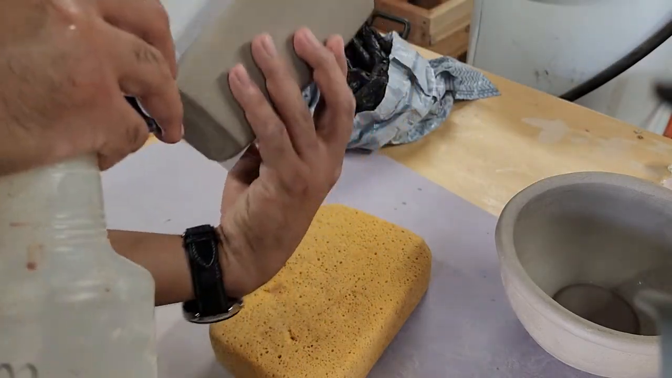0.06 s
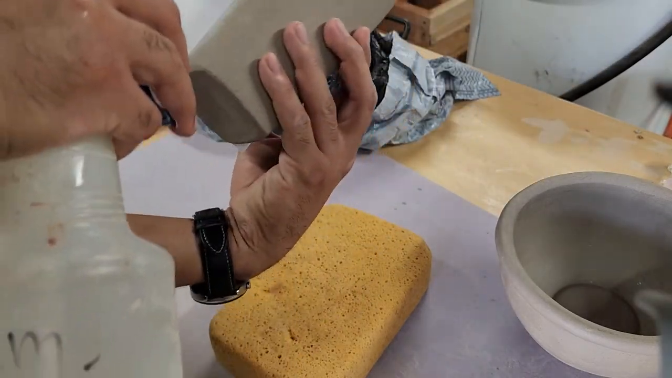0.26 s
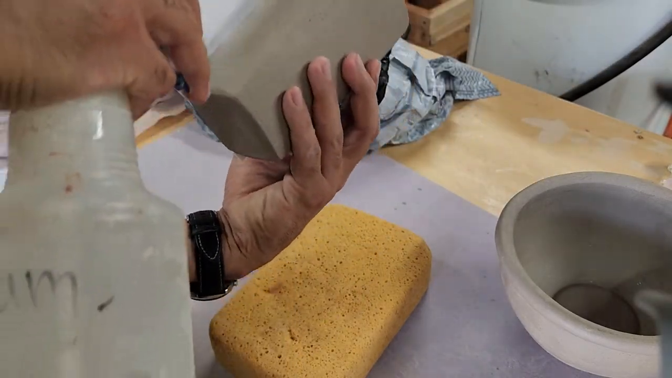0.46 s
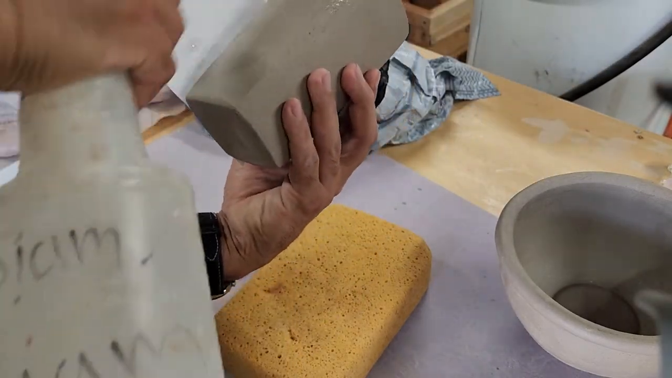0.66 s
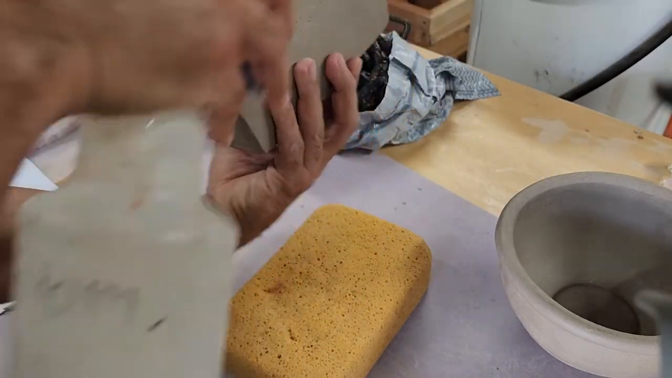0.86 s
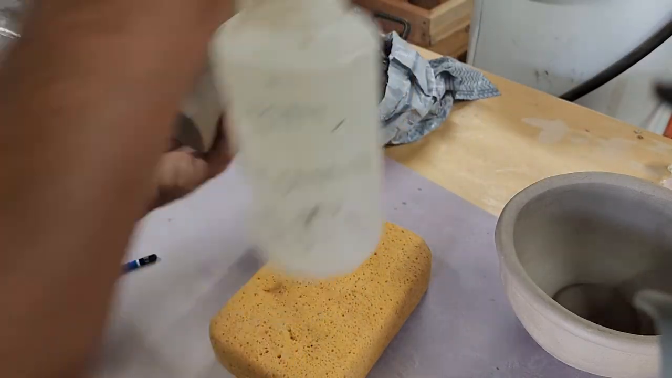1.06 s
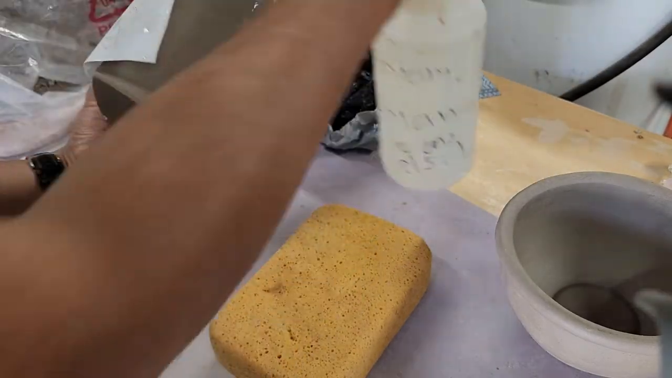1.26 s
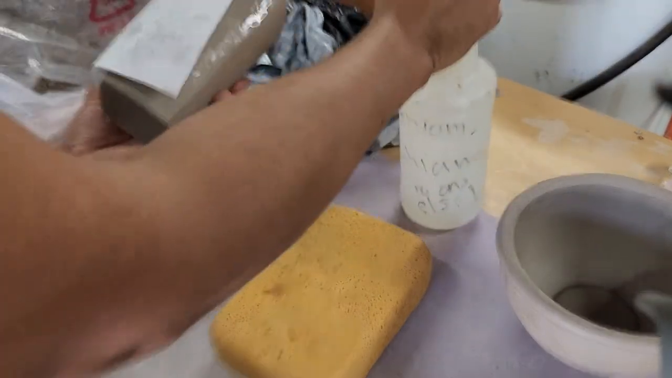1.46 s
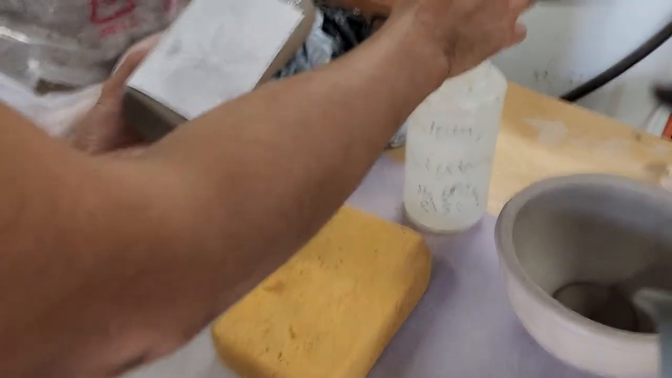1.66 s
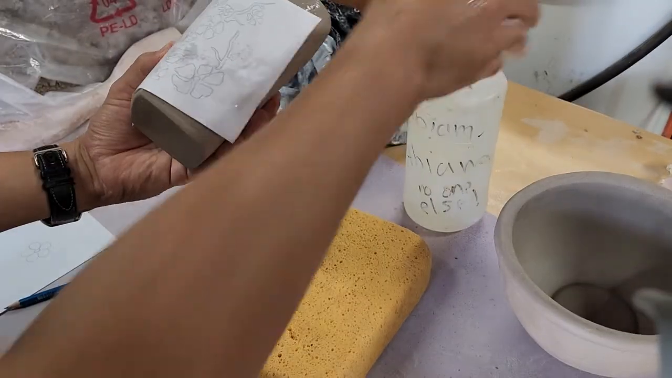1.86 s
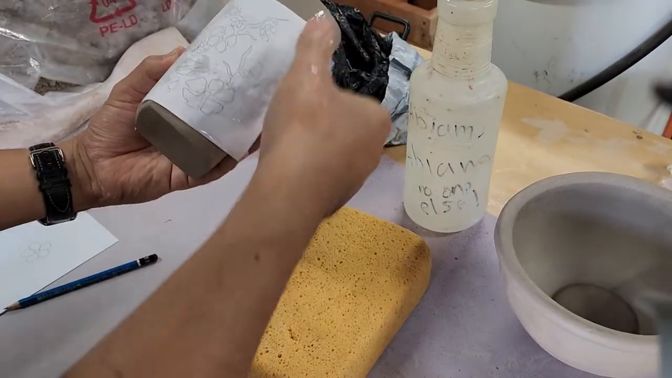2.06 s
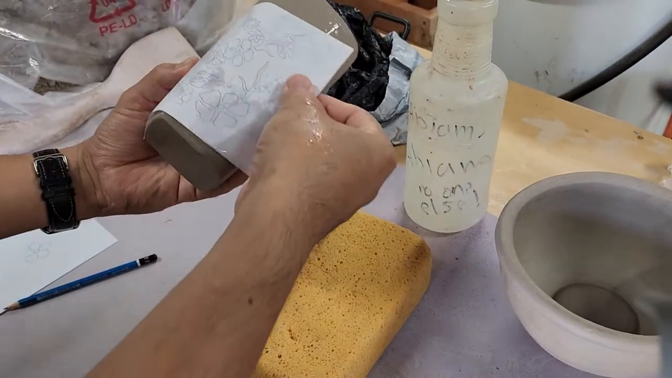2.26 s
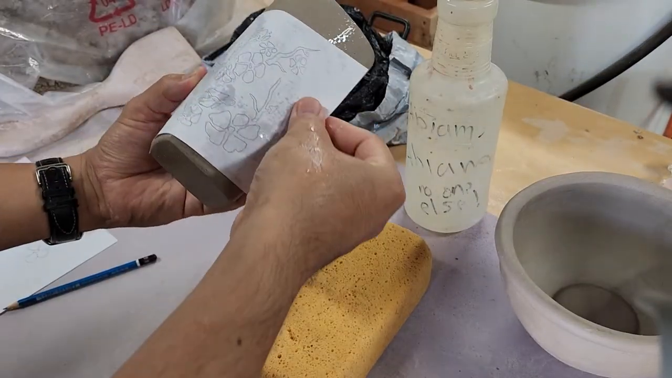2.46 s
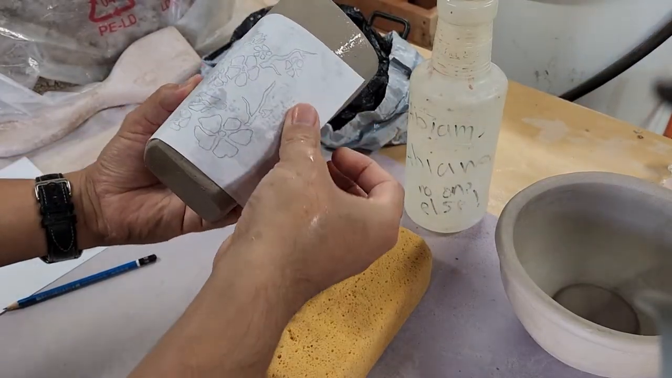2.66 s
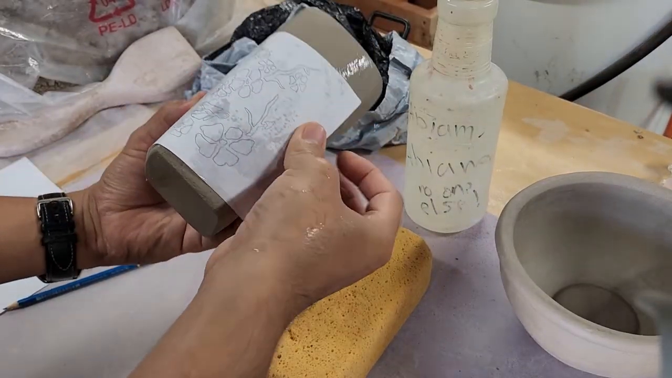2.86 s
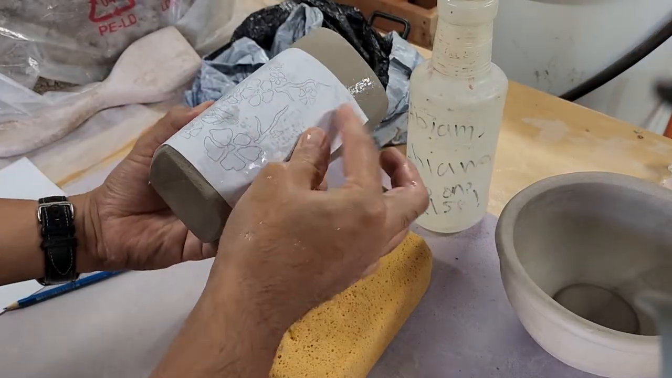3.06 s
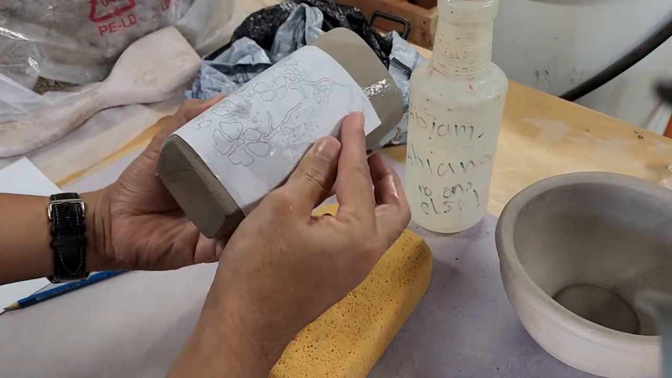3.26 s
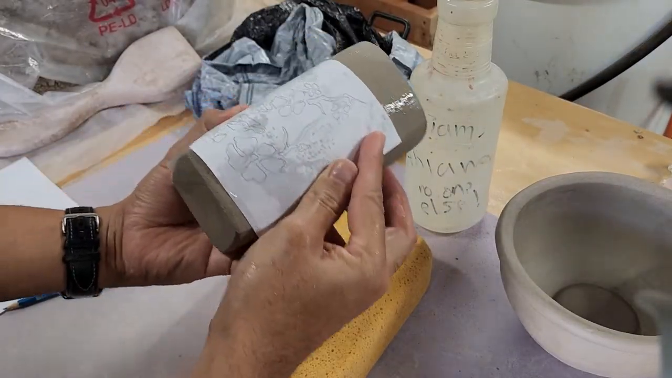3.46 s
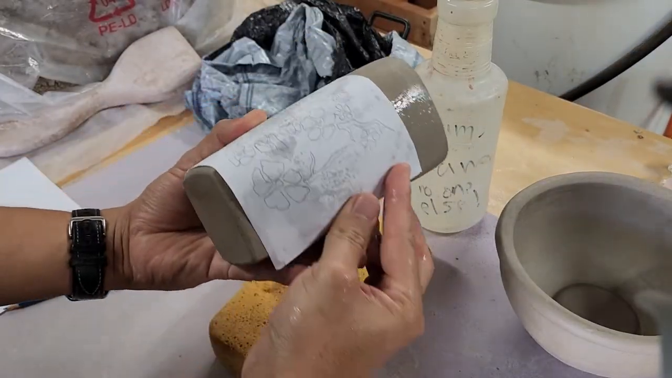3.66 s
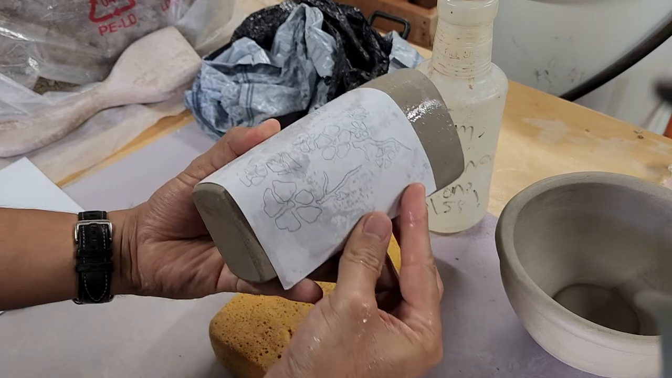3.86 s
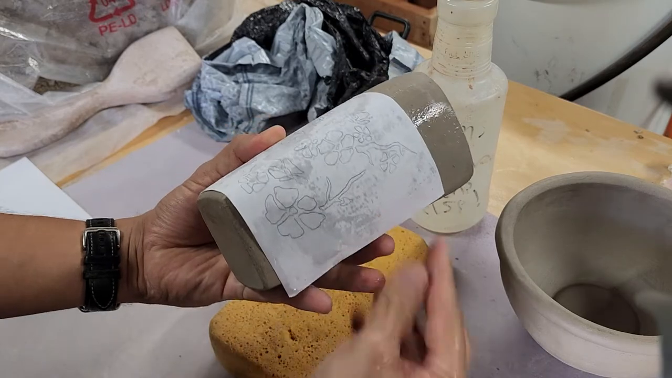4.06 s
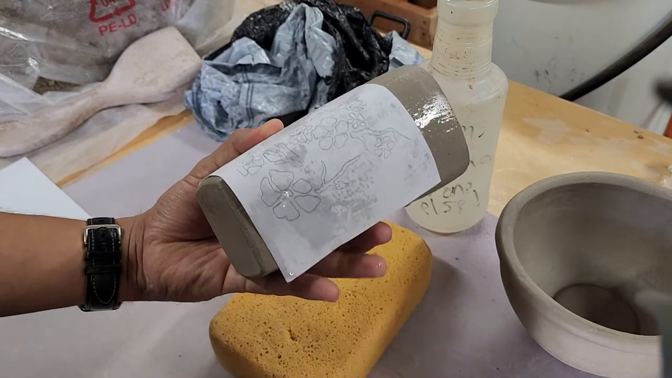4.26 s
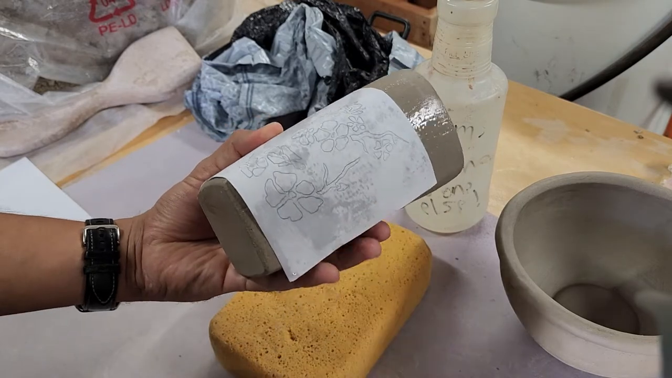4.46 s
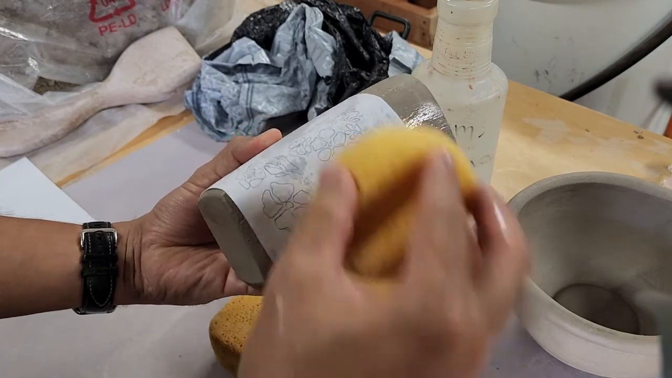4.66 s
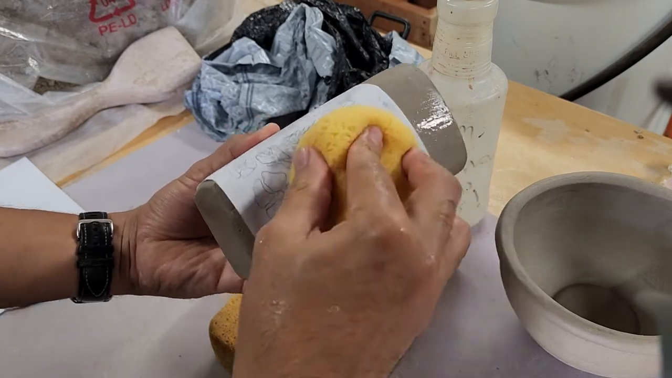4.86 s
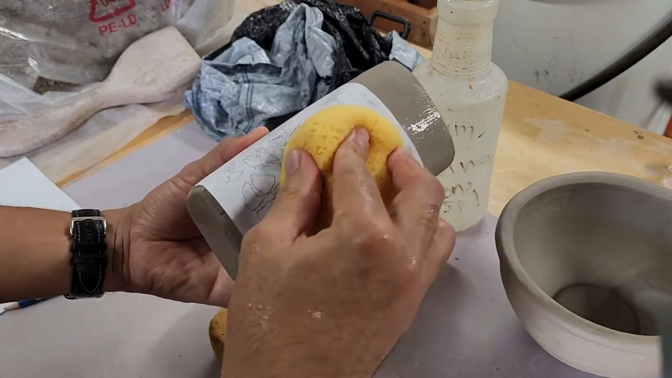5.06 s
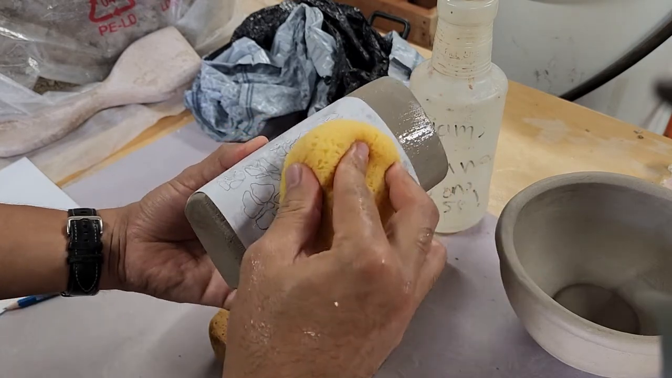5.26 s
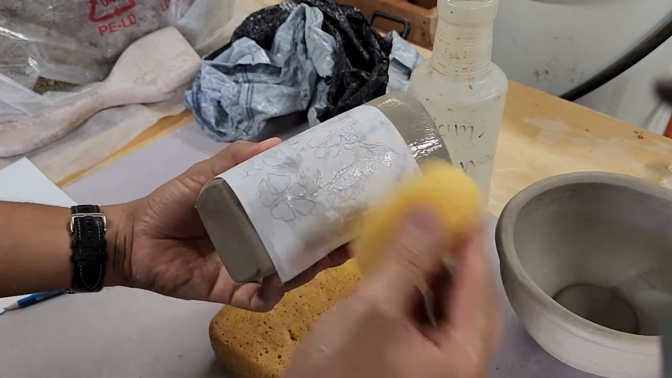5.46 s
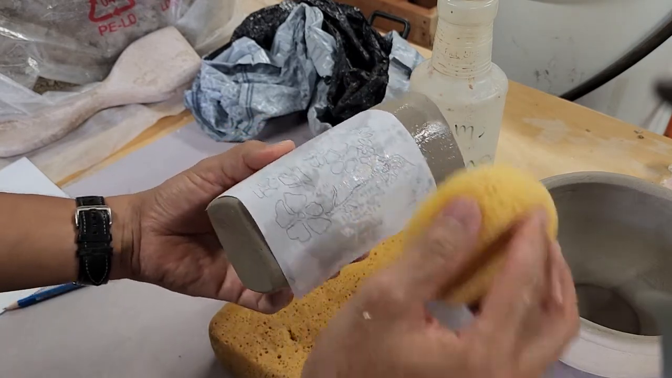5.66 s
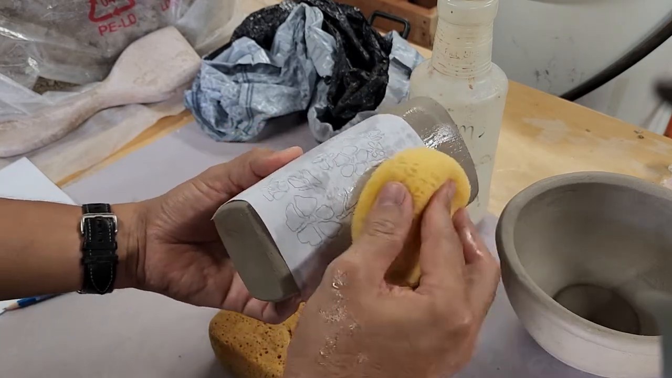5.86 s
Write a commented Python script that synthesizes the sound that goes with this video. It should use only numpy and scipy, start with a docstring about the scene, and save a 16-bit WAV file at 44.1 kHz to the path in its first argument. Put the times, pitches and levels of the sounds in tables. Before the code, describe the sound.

A trigger spray bottle gives one short wet hiss and snaps back, then thumps onto a wooden table before soft sponge dabs on clay.

```python
"""A trigger spray bottle mists a clay cup: coloured noise hisses and patters, and the lever snaps back.
The bottle is set down hard on a wooden table, made of decaying sines and short bursts of noise.
Fingers smooth wet paper onto the cup and a damp sponge dabs it, with small smacks and grainy brushing.
The small studio murmurs with ventilation, a fan hisses on the left, and a far motor hum swells and fades."""
import sys
import numpy as np
from scipy import signal
from scipy.fft import rfft, irfft, next_fast_len
from scipy.io import wavfile

SR = 44100
rng = np.random.default_rng(int(sys.argv[2]) if len(sys.argv) > 2 else 0)


def generate_wav(sig):
    """Save sig (samples, or channels by samples) to the path in sys.argv[1] as 16-bit PCM at SR."""
    pcm = np.round(np.clip(np.atleast_2d(sig).T, -1, 1) * 32767).astype(np.int16)
    wavfile.write(sys.argv[1], SR, pcm)


N = 260631
TIME = np.arange(N) / SR


def from_db(db):
    """Turn decibels into a plain multiplier."""
    return 10 ** (np.asarray(db) / 20)


def rms_one(x):
    """Scale a signal to an average power of 1."""
    return x / np.sqrt(np.mean(x ** 2) + 1e-20)


def at_hz(points, hz):
    """Read a table between its points, with frequency on a log scale as in hearing."""
    table_hz, value = np.transpose(points)
    return np.interp(np.log(np.maximum(hz, 1)), np.log(table_hz), value)


def pan(left_db):
    """Gains of the two channels, with the left louder than the right by left_db."""
    return from_db(np.array([[left_db], [-left_db]]) / 2)


def add(out, start_s, sound):
    """Mix a sound in at a given time, cutting what runs past the end."""
    i = int(round(start_s * SR))
    out[..., i:i + sound.shape[-1]] += sound[..., :N - i]


def low_pass(x, hz, order=2):
    """Soften everything above a frequency."""
    return signal.sosfilt(signal.butter(order, min(hz, SR / 2 - 1), fs=SR, output="sos"), x)


def band_pass(x, edges_hz, order=2):
    """Keep mainly what lies between two frequencies."""
    return signal.sosfilt(signal.butter(order, edges_hz, "band", fs=SR, output="sos"), x)


def noise(spectrum, size=N):
    """Coloured stereo noise of rms 1; the two channels are most alike in the bass."""
    # how alike left and right are: (frequency [Hz], likeness [0 to 1])
    likeness = [(60, 0.97), (130, 0.93), (290, 0.75), (640, 0.18), (1800, 0.31), (7000, 0.025)]
    padded = next_fast_len(size, True)
    hz = np.fft.rfftfreq(padded, 1 / SR)
    mid, side = rfft(rng.standard_normal((2, padded)))
    alike = np.clip(at_hz(likeness, hz), -1, 1)
    both = np.sqrt(1 + alike) * mid + np.sqrt(1 - alike) * side * [[1], [-1]]
    # keep up to an octave beyond each end of the table
    inside = (hz > spectrum[0][0] / 2) & (hz < spectrum[-1][0] * 2)
    coloured = both * inside * from_db(at_hz(spectrum, hz))
    return rms_one(irfft(coloured, padded)[:, :size])


def fade(t, t60):
    """Die away smoothly, by 60 dB in t60 seconds."""
    return np.exp(-np.log(1000) * t / t60)


def flutter(hz):
    """Random wobble, mostly slower than hz, with an rms of 1."""
    return rms_one(low_pass(rng.standard_normal(N), hz))


def envelope(start_s, stop_s, attack_s, t60):
    """Rise towards 1 from the start, hold, and die away after the stop."""
    rise = 1 - np.exp(-np.maximum(TIME - start_s, 0) / attack_s)
    return rise * fade(np.maximum(TIME - stop_s, 0), t60)


def swell(peak_s, width_s):
    """A bell-shaped rise and fall of height 1."""
    return np.exp(-.5 * ((TIME - peak_s) / width_s) ** 2)


def ring(modes):
    """A body's answer to one click: its modes are dying sines, every other one upside down."""
    t, out = TIME[:2 * SR], 0
    for k, (hz, db, t60) in enumerate(modes):
        out = out + (-1) ** k * from_db(db) * np.sin(2 * np.pi * hz * t) * fade(t, t60)
    return out


def ticks(rows):
    """Each tick is a quickly dying flurry of tiny contacts heard through one resonance."""
    out, t = np.zeros((2, N)), TIME[:SR // 4]
    for start_s, db, hz, octaves, t60 in rows:
        edges = hz * 2 ** (np.array([-.5, .5]) * octaves)
        # a filter edge must stay below half the sample rate
        edges = np.minimum(edges, [SR / 2 - 2, SR / 2 - 1])
        fading = fade(t, t60)
        flurry = noise([(100, 0), (16000, 0)], size=len(t)) * fading
        tick = band_pass(flurry, edges)
        # give each channel the energy of the fade alone, whatever the filter took away
        tick = tick * np.linalg.norm(fading) / np.linalg.norm(tick, axis=1, keepdims=True)
        add(out, start_s, from_db(db) * tick)
    return out


def motor():
    """A far motor is a single sine that swells in mid-run while its pitch slowly sags."""
    on_s, peak_s, off_s = 2.52, 3.42, 4.07
    base_db, swell_db, swell_s, waver_db = -65.5, 8.5, 0.29, 1.3
    peak_hz, sag_hz_per_s = 179.3, 5.2
    hz = peak_hz - sag_hz_per_s * (TIME - peak_s)
    db = base_db + swell_db * swell(peak_s, swell_s) + waver_db * flutter(6.9)
    running = envelope(on_s, off_s, attack_s=0.076, t60=3.4)
    tone = np.sqrt(2) * np.sin(2 * np.pi * np.cumsum(hz) / SR)
    return running * from_db(db) * tone


def background(rumble_db=-60.5, air_db=-76, fan_db=-77, fan_left_db=12, swell_s=0.042):
    """Steady noises of ventilation, room air and a fan on the left, with the far motor."""
    # colours of the three noises: (frequency [Hz], level per Hz [dB])
    rumble_colour = [(20, -31), (40, -6), (58, -14), (70, 4), (85, -6), (120, -11), (175, -13.5),
                     (250, -15), (340, -32)]
    air_colour = [(300, 1.5), (620, -7), (1000, 0), (3300, -11.5), (7000, -19), (9000, -32.5),
                  (16000, -23.5)]
    fan_colour = [(750, -14), (1050, -10), (1450, -1), (1750, -4), (2000, -15), (5700, -27.5), (6400, -19),
                  (9500, -33.5), (16000, -42.5)]
    # the rumble swells briefly: (time [s], rise [dB])
    rumble_swells = [(0.02, 4.1), (0.55, 4.1), (3.88, 3.7)]
    swells_db = sum(rise_db * swell(peak_s, swell_s) for peak_s, rise_db in rumble_swells)
    rumble = from_db(rumble_db + swells_db) * noise(rumble_colour)
    air = from_db(air_db) * noise(air_colour)
    fan = from_db(fan_db) * noise(fan_colour) * pan(fan_left_db)
    return motor() + fan + rumble + air


def pump():
    """Valves tick and spit through the stroke; spring, lever and piston fly back at its end."""
    # valve ticks: (time [s], level [dB], frequency [Hz], decay t60 [s])
    valves = [(0.5435, -55, 4300, 0.03), (0.574, -36, 14000, .03), (0.7959, -46.5, 5300, 0.017),
              (0.863, -44.5, 8000, 0.036), (0.928, -54, 4470, 0.062)]
    # spring squeak, lever crack, piston knock:
    # (time [s], level [dB], frequency [Hz], width [octaves], decay t60 [s])
    trigger_return = [(0.878, -52.5, 2900, .25, 0.17), (0.892, -28, 4820, 0.92, 0.017),
                      (0.895, -39.5, 1750, 1.8, 0.02)]
    valve_octaves = 2
    valve_rows = [(start_s, db, hz, valve_octaves, t60) for start_s, db, hz, t60 in valves]
    return ticks(valve_rows + trigger_return) * pan(3.7)


def flow(delay_s, attack_s, t60, shut_t60=0.059):
    """The jet builds, holds, surges as the piston bottoms out, and dribbles a little past the lever's snap."""
    squeeze_s, bottom_s, dribble_stop_s = 0.5453, 0.7206, 0.97
    surge_db, surge_width_s, dribble_db = 3.5, 0.0071, -19
    surge = from_db(surge_db * swell(bottom_s, surge_width_s))
    squeeze = envelope(squeeze_s + delay_s, bottom_s, attack_s, t60) * surge
    dribble = from_db(dribble_db) * envelope(bottom_s, dribble_stop_s, attack_s, shut_t60)
    return np.maximum(squeeze, dribble)


def spray(sputter_db=1.6, sputter_hz=500, surge_db=0.9, surge_hz=70):
    """The jet breaks into droplets, hissing at the nozzle and pattering more darkly on the clay."""
    # colours of the nozzle hiss and the mist on the clay: (frequency [Hz], level per Hz [dB])
    nozzle_colour = [(1500, -16.5), (2800, -8), (4200, -2.5), (5600, -4), (8500, -8), (12000, -9.5),
                     (16000, -10)]
    mist_colour = [(200, -18), (450, -10), (900, -3.5), (1550, -1), (2100, -0.5), (2500, -6), (4000, -11.5)]
    hiss_db, mist_db = -46.5, -52  # before the unrest and the left-right balance
    # the mist reaches the clay later and builds more slowly
    hiss_flow = flow(delay_s=0, attack_s=0.017, t60=0.318)
    mist_flow = flow(delay_s=.012, attack_s=0.022, t60=0.13)
    patter_db = 2.5 * flutter(900)
    hiss = from_db(hiss_db) * hiss_flow * noise(nozzle_colour)
    patter = from_db(mist_db + patter_db) * mist_flow * noise(mist_colour)
    unrest_db = sputter_db * flutter(sputter_hz) + surge_db * flutter(surge_hz)
    return (hiss + patter) * from_db(unrest_db) * pan(2.2)


def water(gulp_octaves=0.59, gulp_cycles=51):
    """Pockets of air ring briefly as the pump refills and the water sloshes, the lower ones longer."""
    # (time [s], level [dB], frequency [Hz])
    gulps = [(0.8694, -47, 870), (0.971, -54.5, 2154), (0.981, -50, 1440), (0.9877, -49, 1450),
             (1.0058, -53.5, 1620), (1.8368, -54, 1558), (1.8999, -58, 1290)]
    rows = [(start_s, db, hz, gulp_octaves, gulp_cycles / hz) for start_s, db, hz in gulps]
    return ticks(rows) * pan(3.7)


def trigger(far_ear_s=0.00027):
    """The plastic trigger chatters against its stop and rings; the sound reaches the left side first."""
    # chatter: (time [s], level [dB])
    snap = [(0.8914, -3.5), (0.891, -17), (0.8943, -4)]
    # ringing of the lever: (frequency [Hz], level [dB], decay t60 [s])
    trigger_modes = [(3190, -34, .02), (4020, -33, .013), (5570, -31, .009), (6660, -33, .006)]
    out, click = np.zeros((2, N)), ring(trigger_modes)
    for start_s, db in snap:
        add(out[0], start_s, from_db(db) * click)
        add(out[1], start_s + far_ear_s, from_db(db) * click)
    return out * pan(5)


def bottle_knocks():
    """The plastic base knocks and cracks on the wood; loose things rattle, and a soft low rumble follows."""
    # both tables: (time [s], level [dB], frequency [Hz], width [octaves], decay t60 [s])
    knocks = [(1.4685, -32, 1720, 0.73, 0.025), (1.5066, -42.5, 900, 1.3, .05),
              (1.542, -40, 1470, 1.46, 0.064), (1.6002, -32, 1360, 1.2, 0.031)]
    rattles_and_rumble = [(1.552, -43, 7350, 0.22, 0.0079), (1.615, -47, 3250, 0.13, 0.069),
                          (1.628, -37.5, 294, 2, 0.21)]
    # each knock has a brief, bright crack above it
    crack_ratio, crack_db, crack_octaves, crack_t60 = 2.49, -10, 0.6, 0.016
    cracks = [(start_s, db + crack_db, hz * crack_ratio, crack_octaves, crack_t60)
              for start_s, db, hz, _, _ in knocks]
    return ticks(knocks + cracks + rattles_and_rumble) * pan(2.3)


def table_thump(board_db=-27, board_t60=.38, shove_hz=98, shove_s=0.0035):
    """The bottle shoves the table top, which rings in low modes and a dense clatter of weaker ones."""
    # the bottle lands, rocks and settles:
    # (time [s], shove level [dB], ringing level [dB], contact cut-off [Hz])
    blows = [(1.4698, -9.5, -3, 2484), (1.5066, -19, -7.5, 600), (1.6126, -19, -11, 405)]
    # main modes of the table: (frequency [Hz], level [dB], decay t60 [s])
    table_modes = [(36.1, -40.5, 1.55), (46.2, -22, 0.16), (70.85, -29, 1.17), (88.2, -32, 0.56),
                   (115, -29, 0.14), (131.2, -38, 0.63), (179.7, -28.5, 0.5), (234, -37.5, 0.29),
                   (299, -36.5, 0.31), (326.5, -43, 0.28), (425, -30.5, 0.2), (495, -39.5, 0.3),
                   (618, -51, 0.42), (703, -54, 0.54), (973, -41.5, 0.14), (1900, -23.5, 0.015),
                   (3100, -62, 0.2)]
    # many weaker modes of the table and what stands on it: (frequency [Hz], level per Hz [dB])
    board_colour = [(45, 0), (130, 4.5), (300, 1.5), (500, -4.5), (800, -10), (1600, -16.5), (3000, -25.5),
                    (7000, -29.5), (15000, -38)]
    out, t = np.zeros((2, N)), TIME[:2 * SR]
    # the top gives way and springs back within two cycles
    shove = -t / shove_s * np.exp(1 - t / shove_s) * np.cos(2 * np.pi * shove_hz * t)
    boom = ring(table_modes)
    for start_s, shove_db, ring_db, contact_hz in blows:
        clatter = from_db(board_db) * noise(board_colour, size=len(t)) * fade(t, board_t60)
        # a lower cut-off dulls the ringing
        ringing = low_pass(boom + clatter, contact_hz, order=1)
        add(out, start_s, from_db(shove_db) * shove + from_db(ring_db) * ringing)
    return out


def smacks():
    """Wet paper smacks, the sponge squelches and a finger ticks the cup; each dab pats, splats and fizzes."""
    # (time [s], level [dB], frequency [Hz], width [octaves])
    wet_smacks = [(2.2429, -58.5, 2820, 1.4), (2.7956, -59, 630, 2.3), (3.09, -64.5, 408, 0.34),
                  (3.472, -55, 1770, 1.16), (3.5383, -50.5, 1660, 0.51), (5.134, -60, 1080, 0.55),
                  (5.1871, -61.5, 1170, 0.94), (5.4312, -57, 1030, .4), (5.7212, -56, 2640, 0.69)]
    # (time [s], pat level [dB], pat frequency [Hz], pat width [octaves],
    #  splat level [dB], splat frequency [Hz], fizz level [dB])
    dabs = [(4.779, -40.5, 1060, 1.72, -42, 6400, -50.5), (5.7952, -49, 1500, 1.5, -48, 5360, -58)]
    # fizz of squeezed foam: (frequency [Hz], width [octaves], decay t60 [s])
    fizz = (12500, 0.55, 0.017)
    smack_cycles, overtone_ratio, overtone_db = 49, 3.67, -21
    pat_t60, splat_octaves, splat_t60 = 0.019, 0.65, 0.016
    rows = []
    for start_s, db, hz, octaves in wet_smacks:
        t60 = smack_cycles / hz
        rows.append((start_s, db, hz, octaves, t60))
        rows.append((start_s, db + overtone_db, hz * overtone_ratio, octaves, t60))
    for start_s, pat_db, pat_hz, octaves, splat_db, splat_hz, fizz_db in dabs:
        rows.append((start_s, pat_db, pat_hz, octaves, pat_t60))
        rows.append((start_s, splat_db, splat_hz, splat_octaves, splat_t60))
        rows.append((start_s, fizz_db, *fizz))
    return ticks(rows)


def brushing():
    """Skin and sponge brush the paper, whose damp fibres stick and let go in uneven grains."""
    # strokes: (time of peak [s], level [dB], length [s])
    brushes = [(2.618, -64.5, 0.012), (3.57, -78, 0.041), (4.17, -78.5, 0.095), (5.065, -74, 0.01),
               (5.475, -71, 0.023)]
    # (frequency [Hz], level per Hz [dB])
    brush_colour = [(700, 5.5), (6000, 0.5), (16000, -8)]
    pressure = sum(from_db(db) * swell(peak_s, length_s) for peak_s, db, length_s in brushes)
    grains = rms_one(from_db(6 * flutter(350)))
    return pressure * grains * noise(brush_colour)


def hands(nudge_hz=95, nudge_t60=0.047, rub_db=-63.5):
    """Smacks, brushing, dull rubbing of the pressed sponge, and the ringing of the hand-held cup."""
    # the cup is nudged in the hand: (time [s], level [dB])
    nudges = [(4.666, -45), (4.779, -37), (5.289, -45.5), (5.72, -43)]
    # short note of the hollow cup: (frequency [Hz], level [dB], decay t60 [s])
    cup_modes = [(575, -53, .11)]
    # dull rubbing: (frequency [Hz], level per Hz [dB])
    rub_colour = [(70, -33.5), (110, 12), (200, -0.5), (320, -31)]
    out = (smacks() + brushing()) * pan(7.6)
    for start_s, db in nudges:
        add(out, start_s, ring([(nudge_hz, db, nudge_t60)]))
    # the cup answers the first dab
    add(out, 4.7935, ring(cup_modes))
    # the sponge is pressed on, held, and slowly eased off
    press = envelope(start_s=4.56, stop_s=5.31, attack_s=0.045, t60=2.9)
    return out + from_db(rub_db) * press * noise(rub_colour)


def studio(x, first_echo_s=.004):
    """Many blurred echoes, made of noise bands that die sooner in the treble."""
    # (frequency [Hz], decay t60 [s])
    room_t60 = [(60, .65), (300, .52), (1500, .44), (5000, .3), (15000, .24)]
    t, tail = TIME[:SR], 0
    edges = np.geomspace(30, 17000, 10)
    for low, high in zip(edges, edges[1:]):
        white = noise([(20, 0), (16000, 0)], size=SR)
        band = band_pass(white, [low, high], order=3)
        tail = tail + band * fade(t, at_hz(room_t60, np.sqrt(low * high)))
    # nothing returns until the sound has reached the nearest surface
    tail = tail * np.clip(t / first_echo_s - 1, 0, 1)
    return signal.fftconvolve(x, tail / np.linalg.norm(tail[0]), axes=1)[:, :N]


def scene():
    """Everything happens within arm's reach in one small room, over its background."""
    sprayer = spray() + trigger() + pump()
    thump = table_thump()
    bottle = bottle_knocks() + water()
    handling = hands()
    # each source sends its own share into the room
    to_room = from_db(-12.5) * sprayer + from_db(-10.5) * thump
    to_room = to_room + from_db(-10.0) * bottle + from_db(-13) * handling
    return sprayer + thump + bottle + handling + studio(to_room) + background()


def record(dry):
    """The microphone drops the deepest bass; the top is cut steeply."""
    bass_hz, top_hz = 30, 15900
    thin = signal.sosfilt(signal.butter(2, bass_hz, "high", fs=SR, output="sos"), dry)
    return signal.sosfilt(signal.ellip(10, .2, 70, top_hz, fs=SR, output="sos"), thin)


dry = scene()
out = record(dry)
generate_wav(out)
```